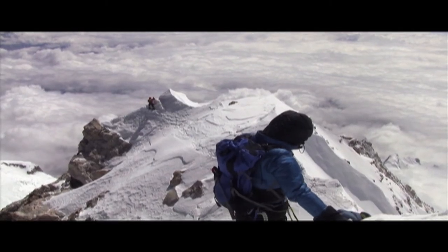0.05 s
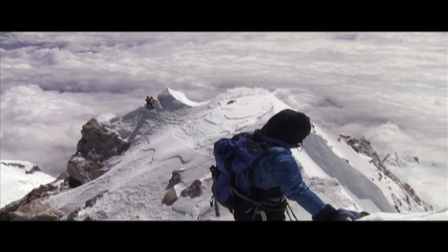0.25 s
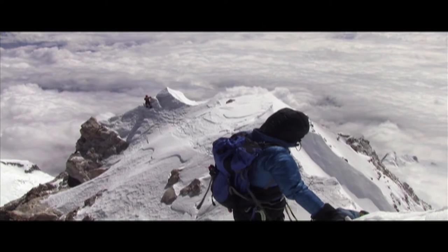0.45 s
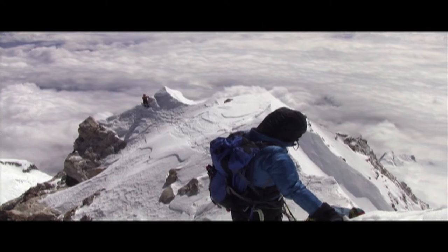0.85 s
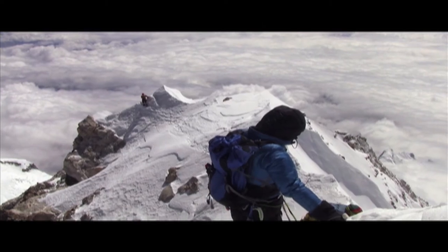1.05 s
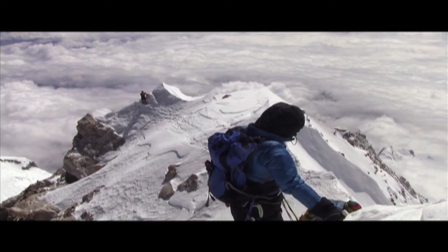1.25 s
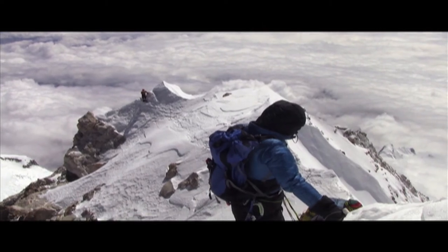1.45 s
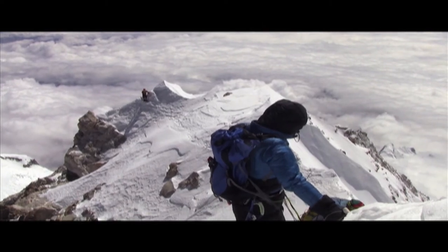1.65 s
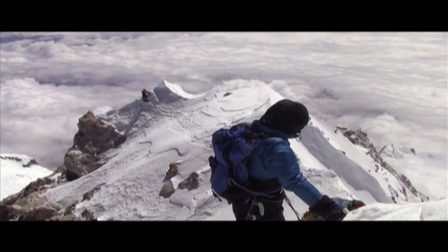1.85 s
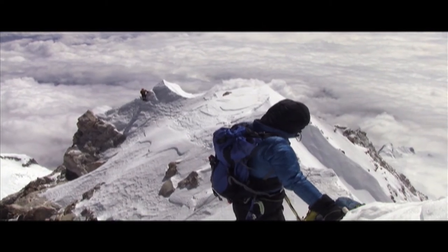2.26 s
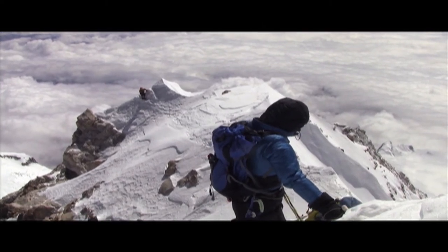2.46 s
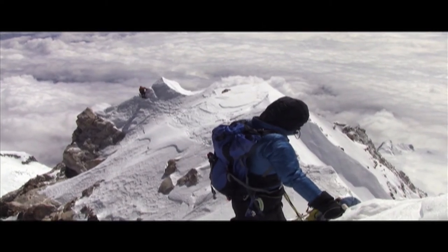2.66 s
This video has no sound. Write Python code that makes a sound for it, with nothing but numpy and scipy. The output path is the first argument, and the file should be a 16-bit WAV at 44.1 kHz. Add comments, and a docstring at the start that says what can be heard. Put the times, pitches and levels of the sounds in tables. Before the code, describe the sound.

Wind rumbles against the microphone on a mountain ridge, swelling and dropping in gusts.

```python
"""Wind rumbles and rasps on a microphone, in gusts that swell and drop away on an open mountain ridge.
Turbulence at the port makes the noise: the harder the air pushes, the brighter it sounds.
Single eddies slap the port in short buffets; small ones snap and large ones thump.
A short hollow ring with two narrow pitches sounds once, perhaps a knock of climbing gear.
A thin sizzle passes once, and a faint hiss lies under the lulls."""
import sys
import numpy as np
from scipy import signal
from scipy.fft import rfft, irfft, next_fast_len
from scipy.io import wavfile

SR = 44100
rng = np.random.default_rng(int(sys.argv[2]) if len(sys.argv) > 2 else 0)


def to_wav(s):
    """Save 16-bit WAV."""
    ch = np.atleast_2d(s).T  # columns
    pcm = np.round(np.clip(ch, -1, 1) * 32767)  # PCM
    wavfile.write(sys.argv[1], SR, pcm.astype(np.int16))


N = 123479

# How much the wind differs between the two ports: frequency_hz, side_minus_mid_db
PORT_DIFFERENCE = [(60, -30), (300, -71.5), (700, -61.5), (1300, -30), (2400, -19), (4400, -4), (8000, 1.5),
                   (15000, 9.5)]


def turbulence(gain_db=-33.0, band_count=10):
    """Turbulent pressure fluctuation: each band of noise grows with the push by its own power law."""
    # Spectrum at the usual push: frequency_hz, density_db
    colour = [(25, -36), (50, -38), (70, -25), (110, -16), (200, -4.5), (320, 0), (480, 0), (780, -2.5),
              (1100, -8), (1500, -13), (2100, -17), (3200, -22), (4500, -30.5), (6500, -44.5), (9000, -58),
              (10500, -69.5), (15000, -89)]
    # Growth of each band with the push: frequency_hz, slope_db_per_db
    growth = [(40, 0.3), (120, 0.54), (250, 0.78), (600, 1), (1300, 1.3259), (3000, 0.67), (6000, 1.5),
              (12000, 2.5)]
    # How far each band follows brightness and rasp: frequency_hz, share
    brightness_shares = [(200, 0.04), (600, -0.36), (1300, 0.49), (3000, 1.24), (7000, 2.5), (14000, 2.5)]
    # Fast unsteadiness of the flow: frequency_hz, depth_db
    flutter_depth = [(80, -3.5), (400, 2), (1200, 2.5), (4000, 3.5), (12000, -4)]
    push_db, brightness_db = airflow()
    unsteadiness = 1 / np.sqrt(1 + amp(push_db - 9) ** 2)  # above a 9 dB push the roar evens out
    flutter = unsteadiness * wobble(lo_hz=34.2, hi_hz=264)
    rasp = unsteadiness * (0.36 * wobble(lo_hz=264, hi_hz=900) + spurts())
    churn = rng.standard_normal((2, N))
    size = next_fast_len(N + 4096)
    freqs = np.fft.rfftfreq(size, 1 / SR)
    centres_hz = np.geomspace(40, 13000, band_count)
    spectra = 0
    for hz, selector in zip(centres_hz, np.eye(band_count)):
        share = curve_at(brightness_shares, hz)
        shake = unit(amp(curve_at(flutter_depth, hz) * flutter + share * rasp))
        swell = amp(curve_at(growth, hz) * push_db + share * brightness_db)
        band = curve_at(np.c_[centres_hz, selector], freqs)
        spectra = spectra + rfft(churn * swell * shake, size) * band
    mid, side = spectra * unit(amp(curve_at(colour, freqs)))
    side = side * amp(curve_at(PORT_DIFFERENCE, freqs))
    return amp(gain_db) * stereo(irfft(mid, size), irfft(side, size))[:, :N]


def airflow(attack_s=0.0018, release_s=0.0039, usual_db=-33):
    """Gusts and buffets add in power; gives the push over usual and power-weighted brightness, in dB."""
    # Flow at the port: time_s, level_db, brightness_db
    gusts = [(0.0, -43, -4), (0.038, -59, -1.5), (0.18, -38, -5), (0.34, -36.5, 0), (0.495, -40, -7.5),
             (0.6, -33.5, -3), (0.7, -28, -1.5), (0.8, -26.5, 2.5), (0.83, -30.5, 1), (0.865, -29.5, 1),
             (0.893, -35, -1.5), (0.94, -30.5, -0.5), (1, -32, -3.5), (1.023, -52.5, -4),
             (1.059, -35, -5.5), (1.15, -40, -10), (1.169, -48.5, -7), (1.19, -44, 6), (1.27, -37.5, -9),
             (1.36, -42, -7.5), (1.462, -34, -6), (1.492, -45, -6.5), (1.532, -38, -11.5),
             (1.662, -44.5, -5), (1.704, -51, -4), (1.72, -34, -12), (1.779, -41.5, -6),
             (1.84, -34.5, -1.5), (1.94, -30.5, 1.1), (2.052, -29.5, -3.5), (2.083, -45, -6),
             (2.15, -34, -6), (2.2, -46.5, -9), (2.359, -44.5, -5), (2.47, -42, -6.5), (2.506, -59.5, -6),
             (2.55, -48, -0.5), (2.628, -60.5, -8), (2.678, -44.5, -13.5), (2.728, -86, 14),
             (2.756, -57.5, -7), (2.8, -51.5, -5)]
    # Eddies that hit the port: start_s, length_s, level_db, brightness_db
    buffets = [(0.076, 0.0022, -38, -8), (0.0954, 0.02, -41, -7.5), (0.1546, 0.0052, -33, 0.5),
               (0.2036, 0.016, -32, -2), (0.239, 0.0033, -28.5, -7), (0.262, 0.011, -33.5, -0.5),
               (0.348, 0.014, -35.5, 2), (0.4297, 0.01, -31.5, -1.7), (0.525, 0.034, -34.5, 0.5),
               (0.5725, 0.016, -31, 1), (0.616, 0.012, -28.5, 3), (0.6347, 0.0087, -27, 4.5),
               (0.73, 0.027, -24, 0.8), (0.7624, 0.028, -25, 4), (0.778, 0.0029, -22.5, -3),
               (0.845, 0.0046, -27, -1), (0.874, 0.014, -22.5, 1.5), (0.896, 0.011, -25, 1),
               (0.921, 0.0074, -18.5, 0.5), (0.933, 0.0072, -21.5, -3.5), (0.968, 0.0045, -37.5, -5),
               (1.0613, 0.025, -28, 3), (1.136, 0.013, -33, -1), (1.18, 0.0086, -30.5, -6),
               (1.1952, 0.0027, -29, 3.5), (1.2022, 0.011, -34.5, 0.5), (1.2911, 0.0077, -27.5, -2),
               (1.3143, 0.008, -33, 3), (1.386, 0.0039, -31.5, 0.5), (1.423, 0.013, -36, 5),
               (1.503, 0.007, -28.5, -4), (1.5134, 0.023, -36.5, 4), (1.5852, 0.014, -32.5, -5),
               (1.621, 0.009, -29, -7.5), (1.652, 0.0055, -37.5, -5.5), (1.7875, 0.033, -33, 0),
               (1.841, 0.0044, -34, 8), (1.871, 0.0034, -34, 9), (1.885, 0.016, -33, -5.5),
               (1.931, 0.012, -24, -0.5), (1.974, 0.0033, -25.5, -3.5), (2.057, 0.0087, -27.5, -1),
               (2.093, 0.014, -35.5, -5), (2.124, 0.014, -33, -3.5), (2.217, 0.029, -32.5, -5.5),
               (2.2777, 0.029, -34, -5), (2.372, 0.007, -28, -1), (2.3965, 0.032, -30, -0.5),
               (2.433, 0.025, -30, 0), (2.521, 0.022, -33, -4), (2.5624, 0.0081, -39.5, -13),
               (2.5786, 0.016, -37.5, -5), (2.6023, 0.0055, -42, -5.5), (2.683, 0.015, -43.5, -6.5)]
    t = np.arange(N) / SR
    times, gust_db, gust_brightness_db = np.transpose(gusts)
    power = amp(np.interp(t, times, gust_db)) ** 2
    weighted_brightness = power * np.interp(t, times, gust_brightness_db)
    for start_s, length_s, level_db, brightness_db in buffets:
        span = slice(int(start_s * SR), int((start_s + length_s + 10 * release_s) * SR))
        age = t[span] - start_s
        rise = np.clip(age / attack_s, 0, 1)
        fall = np.exp(-np.maximum(age - length_s, 0) / release_s)
        eddy_power = (amp(level_db) * rise * fall) ** 2
        power[span] += eddy_power
        weighted_brightness[span] += eddy_power * brightness_db
    return 10 * np.log10(power) - usual_db, weighted_brightness / power


def spurts(rate_per_s=150, decay_s=0.0012, depth=6):
    """Tiny eddies arrive as a Poisson process, each a jump in brightness that decays exponentially."""
    hits = (rng.random(N) < rate_per_s / SR) * rng.uniform(0.5, 1.5, N)
    lift = np.tanh(signal.lfilter([1], [1, -np.exp(-1 / (decay_s * SR))], hits))
    return depth * (lift - lift.mean())


def snaps(knock_hz=700, pitch_spread=0.19, knock_rise_s=0.00067, crack_decay_s=0.0012):
    """Impulsive excitation: a small eddy gives a heavily damped knock and a dry crack of noise."""
    # Small eddies right at the port: start_s, knock_db, crack_db
    eddies = [(0.6375, -12, -25), (0.7328, -23, -26.5), (0.9255, -19.5, -18), (1.139, -15.5, -27.5),
              (1.1948, -14.5, -45), (1.316, -24, -34), (1.423, -20.5, -38), (1.5055, -35, -46),
              (1.576, -25, -61), (1.5955, -19.5, -43), (1.7125, -28, -50), (1.8945, -20, -29),
              (1.9355, -14.5, -33), (1.9778, -14, -42), (2.3305, -22.5, -57), (2.5235, -36, -35.5)]
    # Spectrum of the crack: frequency_hz, density_db
    crack_colour = [(500, -17), (1400, 10.5), (3200, -3), (6000, -25.5), (14000, -47)]
    age = np.arange(0, 12 * crack_decay_s, 1 / SR)
    knock_envelope = age / knock_rise_s * np.exp(1 - age / knock_rise_s)
    knocks, crack_envelope = np.zeros((2, N))
    for start_s, knock_db, crack_db in eddies:
        span = slice(int(start_s * SR), int(start_s * SR) + len(age))
        pitch_hz = knock_hz * (1 + pitch_spread * rng.uniform(-1, 1))
        swing = np.sin(2 * np.pi * pitch_hz * (age - knock_rise_s))
        knocks[span] += amp(knock_db) * knock_envelope * swing
        crack_envelope[span] += amp(crack_db) * np.exp(-age / crack_decay_s)
    cracks = crack_envelope * rng.standard_normal((2, N))
    mid, side = rfft(cracks) * unit(spectral_gain(crack_colour))
    side = side * spectral_gain(PORT_DIFFERENCE)
    port = signal.butter(2, [240, 2500], "bandpass", fs=SR, output="sos")
    return signal.sosfilt(port, knocks) + stereo(irfft(mid, N), irfft(side, N))


def thumps(half_length_s=0.009):
    """Coherent pressure: large eddies push on both ports alike, in dull pulses of bass."""
    # Large eddies: centre_s, level_db
    eddies = [(0.606, -53), (0.719, -43), (0.932, -33), (0.952, -40), (1.898, -35), (1.984, -36.5)]
    # Spectrum of a thump: frequency_hz, density_db
    colour = [(25, -20), (45, -20), (80, 0), (150, 6.5), (210, 15), (350, -42), (1000, -59), (5000, -100)]
    envelope = sum(amp(level_db) * pulse(centre_s, half_length_s) for centre_s, level_db in eddies)
    return envelope * noise(spectral_gain(colour))


def ring(centre_s=1.076, half_length_s=0.01, level_db=-28):
    """Resonance: a short hollow ring with two narrow pitches, perhaps a knock of climbing gear."""
    # Resonances: pitch_hz, half_width_hz, level_db
    modes = [(918, 21, 12), (2006, 27, -24)]
    colour = sum(amp(db) / (1 + ((bins() - hz) / half_width) ** 4) for hz, half_width, db in modes)
    return amp(level_db) * pulse(centre_s, half_length_s) * noise(colour)


def sizzle(centre_hz=9200, half_width_hz=3800, level_db=-78):
    """Band-limited noise, uncorrelated between the ports: a thin sizzle that swells and fades once."""
    colour = np.exp(-((bins() - centre_hz) / half_width_hz) ** 2)
    envelope = amp(level_db) * pulse(centre_s=0.348, half_length_s=0.05)
    return envelope * np.array([noise(colour), noise(colour)])


def background(level_db=-71.5):
    """Stationary noise: a faint rumble and hiss, masked by the gusts and heard in the lulls."""
    # Spectrum of the background: frequency_hz, density_db
    colour = [(30, -1), (150, 12.5), (400, 6.5), (1000, 2), (2500, -11), (5000, -14.5), (10000, -18.5),
              (15000, -24)]
    # Its difference between the ports: frequency_hz, side_minus_mid_db
    width = [(60, -34), (900, -27.5), (2000, -25.5), (4400, -12), (8000, -1.5), (15000, 1.5)]
    mid_gain = spectral_gain(colour)
    side_gain = mid_gain * spectral_gain(width)
    side_ratio = np.linalg.norm(side_gain) / np.linalg.norm(mid_gain)
    return amp(level_db) * stereo(noise(mid_gain), side_ratio * noise(side_gain))


def wobble(lo_hz, hi_hz):
    """Random modulation: pink noise between two rates, its extremes rounded by saturation."""
    f = bins() + 1
    band = 1 / np.sqrt(f * (1 + (lo_hz / f) ** 4) * (1 + (f / hi_hz) ** 4))
    return unit(np.tanh(noise(band) / 2))


def pulse(centre_s, half_length_s):
    """Gaussian envelope: a smooth rise and fall around one moment."""
    return np.exp(-((np.arange(N) / SR - centre_s) / half_length_s) ** 2)


def noise(gain):
    """Spectral shaping of white noise, scaled to rms 1."""
    return unit(irfft(rfft(rng.standard_normal(N)) * gain, N))


def spectral_gain(points):
    """Amplitude response at every bin, from a curve in decibels."""
    return amp(curve_at(points, bins()))


def curve_at(points, hz):
    """Interpolation on a logarithmic frequency axis."""
    freqs, values = np.transpose(points)
    return np.interp(np.log(hz + 1), np.log(freqs), values)


def bins():
    """Fourier frequencies of the whole sound, in Hz."""
    return np.fft.rfftfreq(N, 1 / SR)


def stereo(mid, side):
    """Sum and difference give left and right."""
    return np.array([mid + side, mid - side])


def amp(db):
    """Decibels to amplitude ratio."""
    return 10 ** (np.asarray(db) / 20)


def unit(x):
    """Normalisation to rms 1."""
    return x / np.sqrt(np.mean(x ** 2) + 1e-20)


def scene():
    """Superposition: wind on the microphone adds to the quiet of the ridge."""
    return turbulence() + snaps() + thumps() + ring() + sizzle() + background()


def record(dry, cutoff_hz=15400):
    """Band limiting: a linear-phase low-pass removes the highest treble."""
    lowpass = signal.firwin(401, cutoff_hz, window=("kaiser", 9), fs=SR)
    return signal.oaconvolve(dry, lowpass[None], "same")


dry = scene()
out = record(dry)
to_wav(out)
```